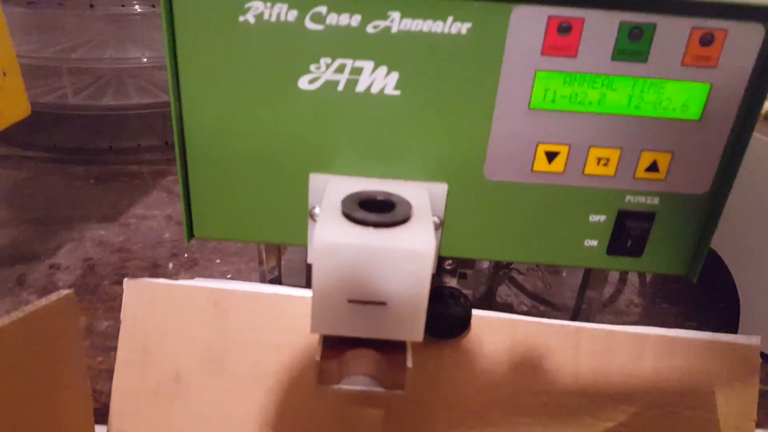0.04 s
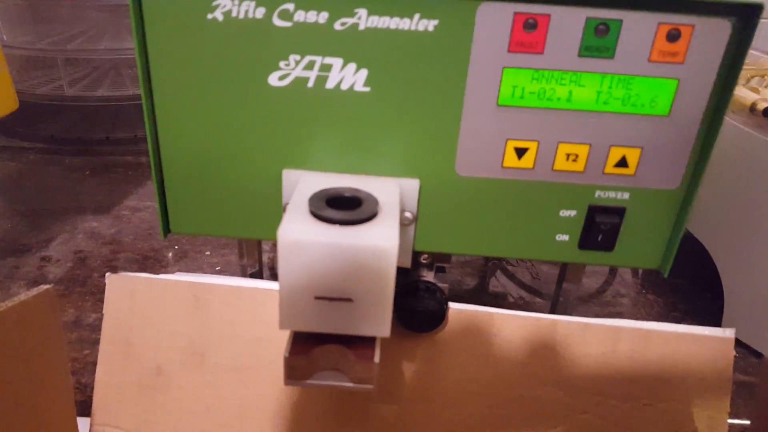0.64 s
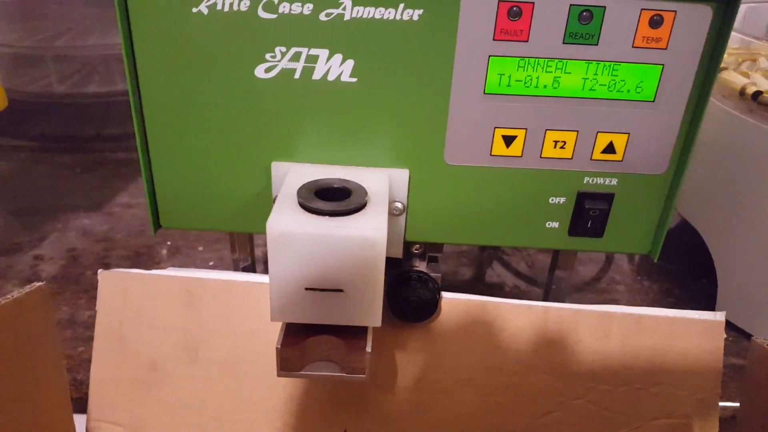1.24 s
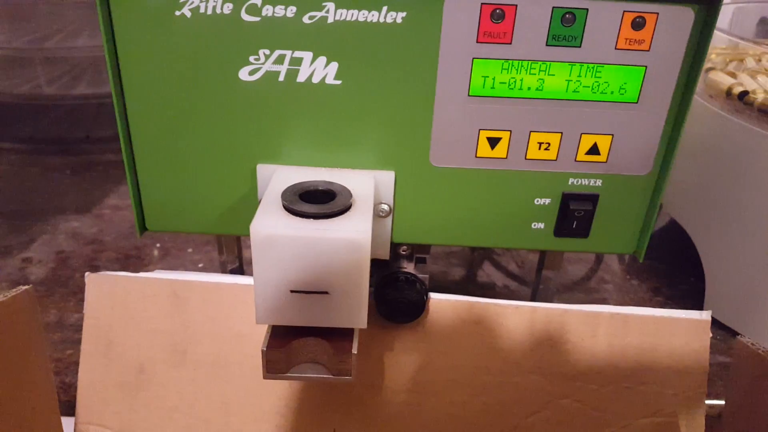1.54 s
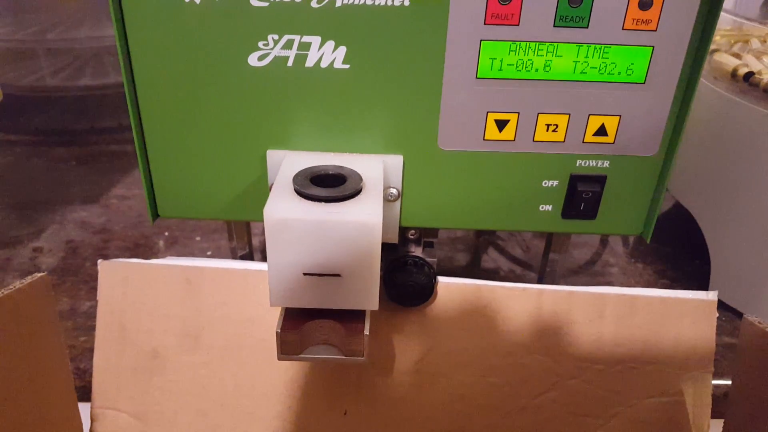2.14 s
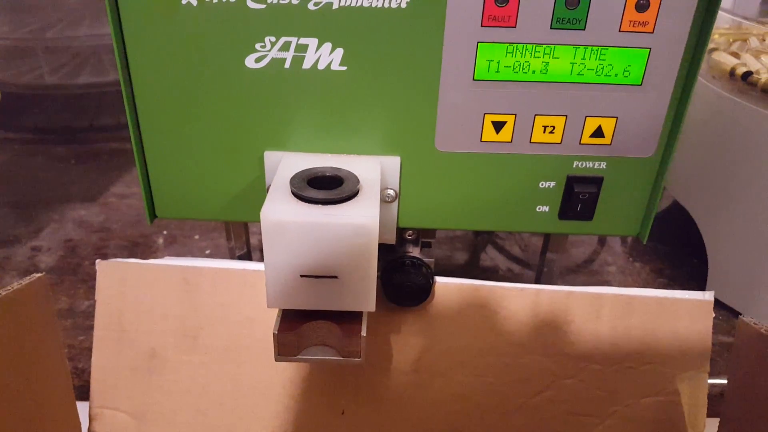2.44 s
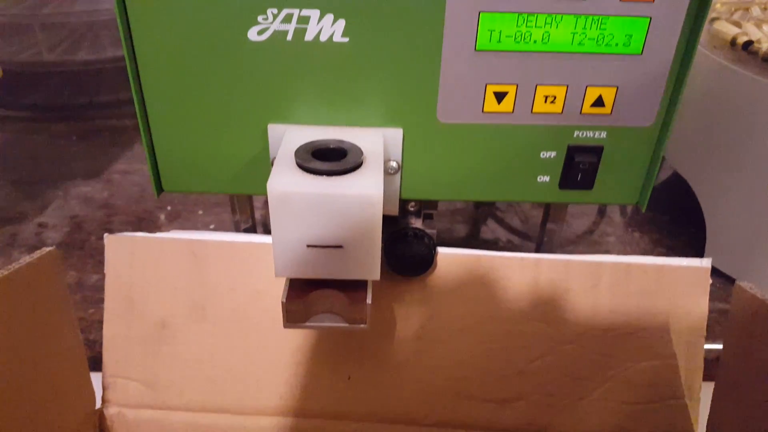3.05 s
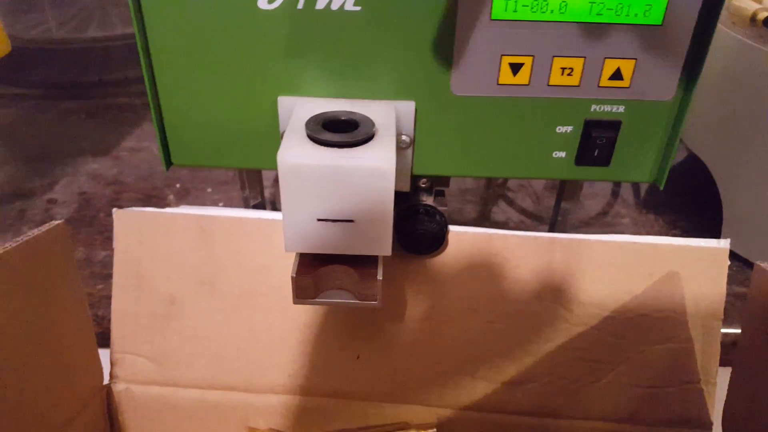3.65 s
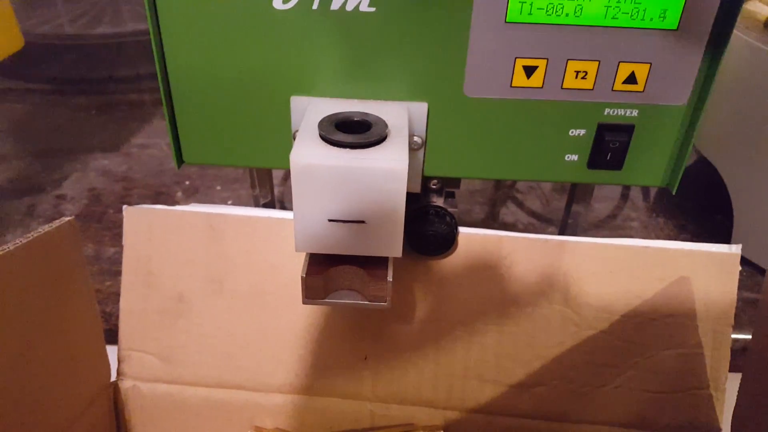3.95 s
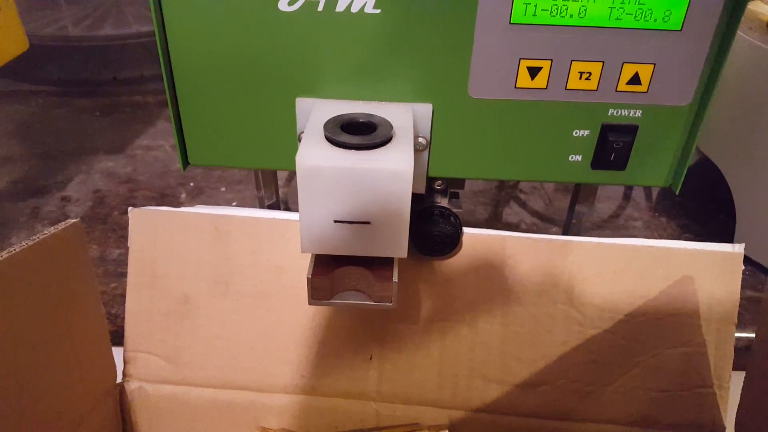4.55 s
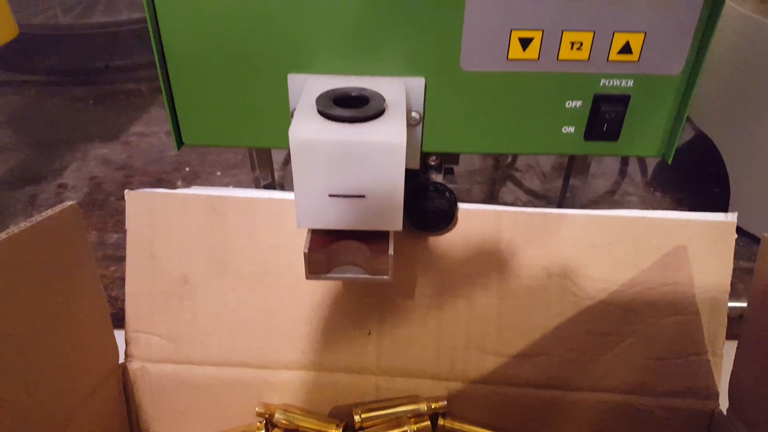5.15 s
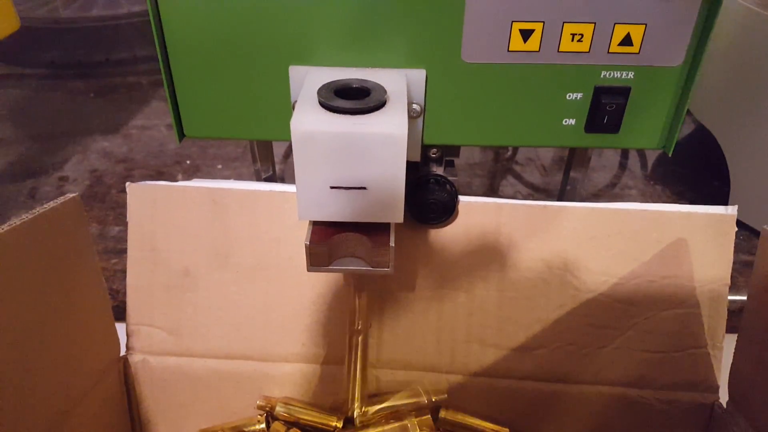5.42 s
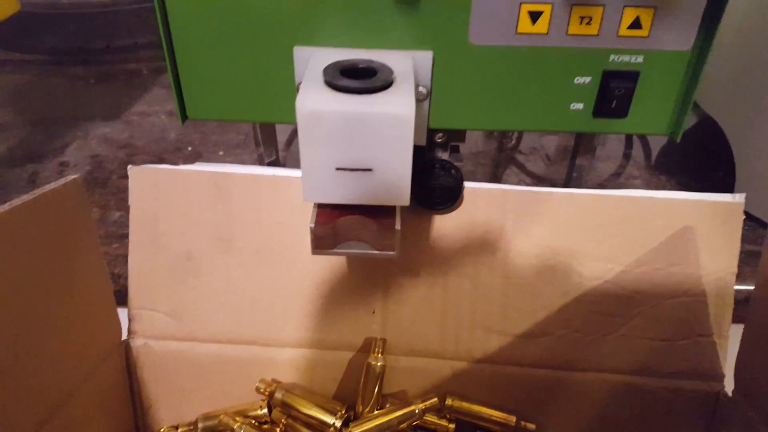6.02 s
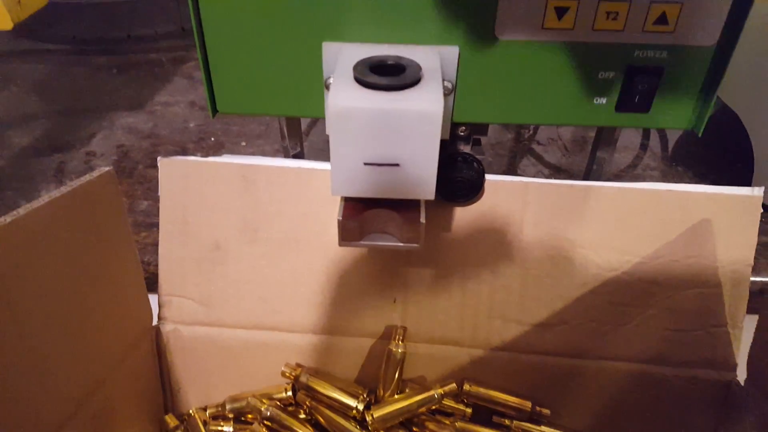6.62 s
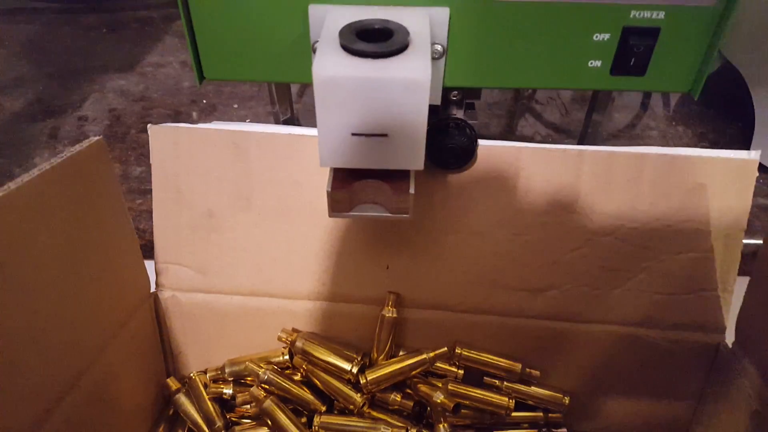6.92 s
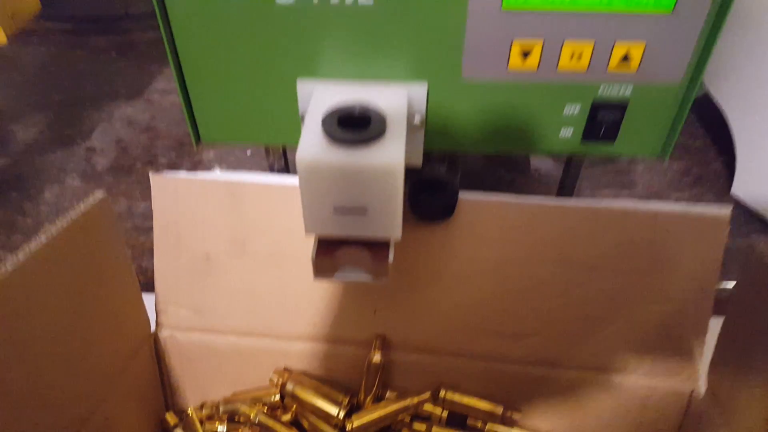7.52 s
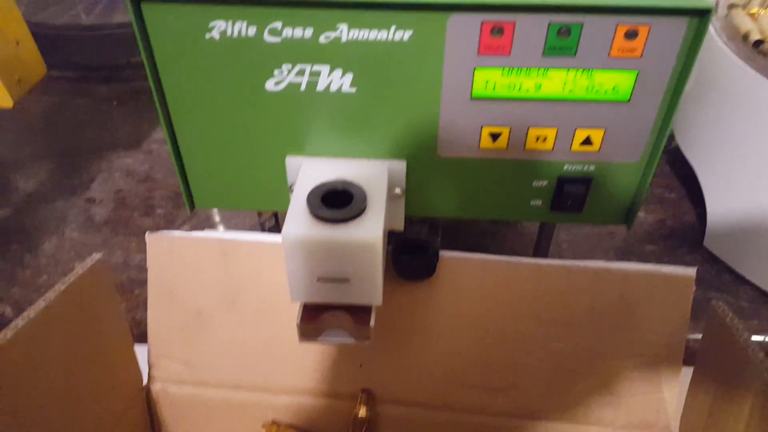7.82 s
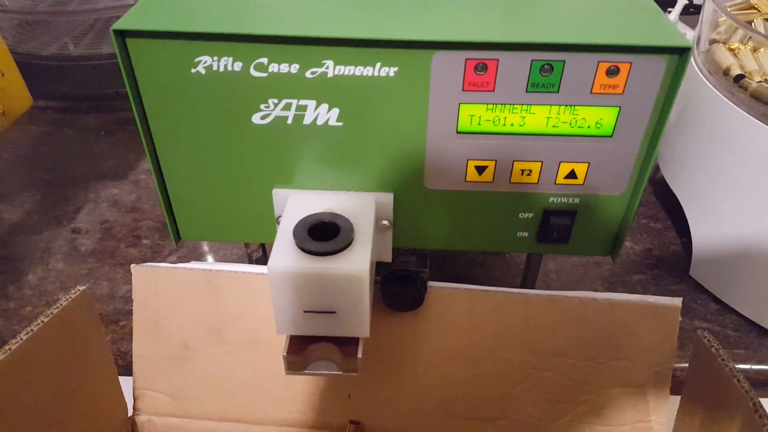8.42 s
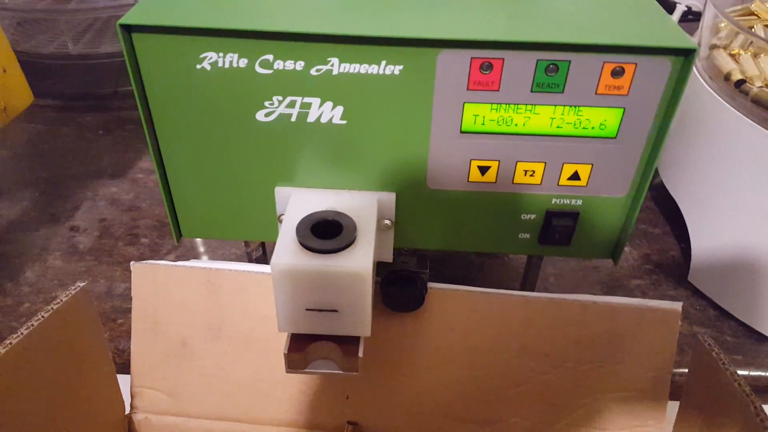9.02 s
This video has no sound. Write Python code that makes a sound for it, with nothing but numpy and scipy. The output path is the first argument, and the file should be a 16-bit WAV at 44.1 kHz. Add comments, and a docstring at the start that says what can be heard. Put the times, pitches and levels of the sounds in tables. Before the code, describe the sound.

Brass cases clink in a tub and one drops into a cardboard box, over a steady machine fan and snapping steel shutter.

```python
"""Case annealer on a workshop bench

The annealer's fan rushes and hums up close while a hand picks through a tub of brass cases that scrape,
clink and ring. A steel shutter snaps open; a case drops onto the heap in a booming cardboard box and
bounces to rest. The next case taps into the plastic holder, the shutter snaps back, the hand rummages."""
import sys
import numpy as np
from scipy import signal
from scipy.fft import rfft, irfft, next_fast_len
from scipy.io import wavfile
from scipy.ndimage import uniform_filter1d

SR = 44100
rng = np.random.default_rng(int(sys.argv[2]) if len(sys.argv) > 2 else 0)


def unload_wav(signal):
    """Save mono or channel-first audio to the path in sys.argv[1] as 16-bit WAV at rate SR, clipped to [-1, 1]."""
    wavfile.write(
        sys.argv[1],
        SR,
        np.round(np.clip(np.atleast_2d(signal).T, -1, 1) * 32767).astype(np.int16),
    )


N = 408807
T = np.arange(N) / SR
AGE = np.arange(SR // 4) / SR  # time since a blow

# the dropped case lands on the heap and bounces to rest: t/s, boom/dB, crunch/dB, tick/dB
BOUNCES = [(5.449, -4.5, -21, -43.5), (5.4534, -11.5, -2, -39), (5.4592, -6.5, -24, -19.5),
           (5.49, -15.5, -5.5, -4), (5.508, -14, -20, -9), (5.526, -35, -12, -7), (5.536, -32.5, -9, -20),
           (5.547, -16, -12.5, -15), (5.558, -23, -16, -28), (5.577, -15, -38.5, -40),
           (5.607, -39, -23, -23.5), (5.662, -37, -18, -9.5), (5.712, -30.5, -22.5, -13),
           (5.754, -37.5, -36.5, -28.5), (5.837, -43, -31, -30.5), (5.861, -36, -25.5, -23),
           (5.883, -44.5, -42, -50), (5.923, -51.5, -43, -40)]


def tub_clinks():
    """Cases knock together in the tub, their attacks blurred by its walls."""
    # the clearest knocks: t/s, tick/dB, ring/dB, left minus right/dB
    hits = [(0.172, -36, -50, -7), (0.2003, -18, -37, -11), (0.273, -28, -44, -2), (0.2864, -18.5, -22, -5),
            (0.3456, -30, -27, -2), (0.4299, -33, -31, -9), (0.4554, -35, -50, -2), (0.5425, -28, -38, -7),
            (0.595, -39, -35, 0), (0.7007, -17.5, -48, -3), (0.8618, -30.5, -26.5, -4),
            (7.36, -11, -18, -2), (7.4694, -33, -24.5, -2), (7.5497, -26.5, -34, 0), (7.63, -8, -26, 2),
            (7.6909, -4, -26, -3), (7.7567, -17, -26, -4), (8.012, -41, -39, -2), (8.0654, -18, -40, 3),
            (8.1105, -9.5, -21.5, -3.5), (8.1738, -14, -24, -3), (8.21, -6, -17, -2),
            (8.3307, -16.5, -26, 1), (8.504, -31, -64, -5), (8.5547, -25.5, -54, -4), (8.5767, -15, -40, 4),
            (8.6308, -13, -20.5, -2.5)]
    return contacts(hits, tick_db=-1, tick_t60=0.026, rise_s=0.0033, ring_db=-11,
                    hollow_db=-24.5, hollow_t60=0.064, chatter_db=-17)


def heap_clinks(settle_db_per_s=82):
    """Sharp, dry clinks on the open heap, ringing less as the dropped case settles."""
    landing_s = BOUNCES[0][0]
    hits = [(s, db, db - settle_db_per_s * (s - landing_s), 0) for s, _, _, db in BOUNCES]
    return contacts(hits, tick_db=-5.5, tick_t60=0.018, rise_s=0.0014, ring_db=-6.5,
                    hollow_db=-16.5, hollow_t60=0.02, chatter_db=-32)


def contacts(hits, tick_db, tick_t60, rise_s, ring_db, hollow_db, hollow_t60, chatter_db):
    """Each contact ticks, jostles its neighbours, sounds the air in a case and leaves its wall ringing."""
    # colour of a brass tick: f/Hz, level/dB
    tick_eq = [(200, -36), (700, 11.5), (1200, -13), (2100, 1.5), (3700, 4.5), (5000, 1.5), (7000, 8),
               (8300, 3), (10000, -8), (11500, 0.5), (13500, -0.5), (16000, -41)]
    ticks, rings = np.zeros((2, 2, N))
    for s, hit_db, case_db, pan_db in hits:
        tick = burst(hit_db, tick_t60, rise_s)
        chatter = burst(hit_db + chatter_db, t60=0.13)
        add(ticks, s, pan(pan_db) * (tick + chatter))
        # the pitch of the air in a case depends on how its neighbours cover the mouth
        air_hz = 2900 * 2 ** rng.uniform(-1.2, 0.7, size=2)
        air_modes = [(hz, hit_db + hollow_db, hollow_t60) for hz in air_hz]
        wall = undb(case_db + ring_db) * brass_case() * (1 - np.exp(-AGE / 0.0035))
        add(rings, s, pan(pan_db) * (wall + ring(air_modes, spread=0.58)))
    return undb(tick_db) * colour(ticks, tick_eq) + rings


def brass_case(detune=0.00923):
    """One case rings: its size sets the pitch, the point of contact the strength of each mode."""
    # wall modes of a brass case: f/Hz, level/dB, t60/s
    wall_modes = [(11440, 1.5, 0.091), (11520, -2, 0.15), (15480, 0.5, 0.12), (15680, -3.5, 0.16)]
    modes = [(hz, db + 3 * rng.uniform(-0.54, 1), t60) for hz, db, t60 in wall_modes]
    return ring(modes, stretch=1 + detune * rng.uniform(-1.6, 1), spread=1.82)


def rummage():
    """Sliding cases catch and slip: the slips scratch, ring several cases and drum on the tub."""
    # strokes of the hand: t/s, length/s, scrape/dB, ring/dB
    strokes = [(0.09, 0.11, -47, -55), (0.182, 0.11, -33.5, -38), (0.309, 0.28, -35.5, -48),
               (0.644, 0.15, -51, -66), (7.309, 0.099, -32, -48.5), (7.55, 0.05, -34, -30.5),
               (7.599, 0.05, -29.5, -19.5), (7.631, 0.036, -24, -18), (7.718, 0.034, -33.5, -26),
               (8.066, 0.16, -40, -37), (8.215, 0.077, -36.5, -42.5), (8.329, 0.11, -42.5, -46),
               (8.554, 0.078, -41, -47)]
    # colour of brass sliding on brass: f/Hz, level/dB
    scrape_eq = [(300, -10), (1200, 5), (2100, 7.5), (3500, 8), (5000, -0.5), (7000, 1), (8300, -0.5),
                 (10000, -16), (12000, 3.5), (14500, -15), (16000, -13)]
    # body of the tub: f/Hz, level/dB
    tub_eq = [(30, -20.5), (80, -3), (150, -12), (300, -10), (450, 1.5), (560, -1.5), (660, 11.5), (820, 4),
              (1000, 5.5), (1300, -3.5), (2000, -6), (4000, -71)]
    scrape_gain, ring_gain = np.zeros((2, N))
    for s, length_s, slide_db, case_db in strokes:
        push = gesture(s, length_s, attack_s=0.016, t60=0.19)
        scrape_gain = np.maximum(scrape_gain, undb(slide_db) * push)
        ring_gain = np.maximum(ring_gain, undb(case_db) * push)
    slips = [grains(per_s=110) * noise(N) for _ in range(3)]
    rings = unit(sum(convolve(slip, brass_case() * fade(0.1)) for slip in slips))
    force = scrape_gain * unit(sum(slips))
    bright = colour(force, scrape_eq) + ring_gain * rings
    return pan(-2) * undb(-4) * bright + undb(-5) * colour(force, tub_eq)


def hollow_knocks():
    """Some contacts wake a short, pitched, hollow resonance."""
    # cases against the tub and the heap: t/s, f/Hz, level/dB
    knocks = [(0.173, 2000, -32.5), (0.201, 640, -29), (0.275, 2800, -29), (0.283, 2000, -27.5),
              (0.347, 700, -25.5), (0.43, 520, -30.5), (0.509, 1840, -27.5), (0.564, 600, -27),
              (5.488, 1430, -18), (5.541, 800, -13), (5.662, 1500, -23), (7.652, 1300, -25.5),
              (7.676, 1000, -26.5), (8.064, 810, -22.5), (8.286, 810, -28.5)]
    out = np.zeros((2, N))
    for s, hz, db in knocks:
        add(out, s, resonance(burst(db + 2, t60=0.036), hz, width_hz=380))
    return out


def cardboard_box(flex_hz=45, flex_width_hz=60):
    """The cardboard floor booms under the falling case; the heap on it cracks and crunches."""
    # modes of the loaded box: f/Hz, level/dB, t60/s
    box_modes = [(108, -30, 0.12), (202, -15, 0.067), (236.6, -4.5, 0.07), (251.5, -13, 0.38),
                 (353, -7.5, 0.04), (493, -10.5, 0.051), (537, -11, 0.12)]
    # colour of the crunching heap: f/Hz, level/dB
    crunch_eq = [(30, -23), (130, -21.5), (300, 2), (500, 6.5), (660, -15), (850, 7), (1200, 2.5),
                 (1550, 2), (1750, -9), (2450, -4.5), (3500, -24.5), (8000, -21.5), (16000, -41.5)]
    booms, crunches, flex = np.zeros((3, 2, N))
    for s, boom_db, crunch_db, _ in BOUNCES:
        add(booms, s, undb(boom_db - 1) * ring(box_modes, spread=0.14))
        crack = burst(crunch_db + 2, t60=0.0082)
        add(crunches, s, crack + burst(crunch_db - 3, t60=0.039))
    # a small box radiates little deep bass, except as its whole floor gives under the landing
    thud = burst(-31, t60=0.12)
    for _ in range(2):
        thud = resonance(thud, flex_hz, flex_width_hz)
    add(flex, BOUNCES[0][0], thud / np.sqrt(SR / (np.pi * flex_width_hz)))
    return pan(2) * highpass(booms + colour(crunches, crunch_eq), 110, order=3) + flex


def shutter(detune=0.024):
    """The steel shutter snaps, rings and chatters; the cabinet hums after each blow."""
    # blows against the stop: t/s, snap/dB, cabinet/dB, snap t60/s
    blows = [(5.314, -29.5, -43.5, 0.14), (5.335, -29, -53, 0.074), (5.345, -6.5, -27, 0.014),
             (5.353, -18, -28.5, 0.069), (5.366, -26, -23, 0.21), (6.5442, -9, -50.5, 0.022),
             (6.559, -19.5, -20.5, 0.11), (6.575, -17.5, -20.5, 0.03)]
    # modes of the steel shutter: f/Hz, level/dB, t60/s
    steel_modes = [(1980, -16.5, 0.29), (5710, -3, 0.086), (6900, 1.5, 0.08), (7260, -9.5, .11),
                   (14000, 0.5, 0.078)]
    # modes of the sheet-metal cabinet: f/Hz, level/dB, t60/s
    cabinet_modes = [(104, -11, 0.22), (182, -2, 0.1), (319, -4, 0.15), (553, -4.5, 0.2), (855, -11, .1)]
    # colour of the snap: f/Hz, level/dB
    snap_eq = [(40, -21), (150, 2.5), (700, -3), (1600, -1.5), (2400, -1), (3300, -5.5), (4500, -3),
               (6200, 2.5), (7500, 0.5), (10000, -5), (13300, 0), (15000, -5), (16500, -15.5)]
    snaps, steel, panels = np.zeros((3, 2, N))
    for s, snap_db, cabinet_db, t60 in blows:
        add(snaps, s, burst(snap_db, t60))
        # the loose parts sit a little differently at every blow
        stretch = 1 + detune * rng.uniform(-1, 1)
        add(steel, s, undb(snap_db - 16) * ring(steel_modes, stretch, spread=1.5))
        add(panels, s, undb(cabinet_db - 2) * ring(cabinet_modes, stretch, spread=1.0))
    return colour(snaps, snap_eq) + steel + highpass(panels, 90, order=3)


def holder():
    """Short hollow taps of brass on the plastic block."""
    # the case touches the holder: t/s, level/dB
    touches = [(6.296, -29), (6.32, -36), (6.361, -48.5), (6.398, -49.5), (6.49, -22), (6.497, -20.5),
               (6.508, -35), (6.523, -42), (6.546, -16)]
    # modes of the hollow holder: f/Hz, level/dB, t60/s
    cavity_modes = [(359, -10.5, 0.16), (845, 2.5, 0.017), (1504, 0.5, 0.021), (1945, -9.5, 0.027)]
    # colour of a tap on plastic: f/Hz, level/dB
    plastic_eq = [(100, -13), (350, -6), (600, 3), (900, 5), (1200, 2.5), (1700, 2.5), (2300, -1),
                  (3200, -10), (5000, -31), (7500, -20.5), (10000, -51), (16000, -24)]
    taps, hollow = np.zeros((2, 2, N))
    for s, db in touches:
        add(taps, s, burst(db, t60=0.03))
        add(hollow, s, undb(db) * ring(cavity_modes, spread=0.88))
    return pan(2) * undb(-4) * highpass(colour(taps, plastic_eq) + hollow, 140)


def tub_rumble(hz=78, width_hz=95):
    """Soft low bumping each time the tub shifts."""
    # the hand shifts the tub: t/s, length/s, level/dB
    shifts = [(7.308, 0.058, -47.5), (7.55, 0.25, -56.5), (8.062, 0.69, -60), (8.2, 0.04, -51),
              (8.34, 0.035, -53)]
    low = resonance(noise(N, shared_hz=61), hz, width_hz)
    low = unit(resonance(low, hz, width_hz))
    return low * sum(undb(db) * gesture(s, length_s, attack_s=0.022, t60=0.45)
                     for s, length_s, db in shifts)


def fan(wobble=0.00299, flutter_db=1.0, lag_s=0.00016):
    """Rushing air, and blade tones that waver with the speed of the rotor."""
    # colour of the rushing air: f/Hz, level/dB
    air_eq = [(30, -36), (70, -11), (115, -0.5), (200, 2), (420, -5.5), (620, 3.5), (720, 2.5), (1320, 0),
              (1450, -6), (1750, -0.5), (1970, -0.5), (2100, -10.5), (2700, -12), (3700, -21.5),
              (7200, -25), (10200, -41), (13100, -26.5), (16000, -37.5)]
    # blade tones: f/Hz, level/dB
    blades = [(335.5, -54), (671, -79), (1006.5, -72), (1534, -64.5), (1725, -62.5)]
    air = colour(noise(N, shared_hz=904), air_eq)
    # echoes inside the housing comb the rush into many narrow resonances
    echoes = noise(len(AGE)) * fade(0.097)
    air = unit(air + undb(-10) * convolve(air, echoes / np.linalg.norm(echoes[0])))
    air *= undb(-46 + 0.03 * wander(5))
    rotor_s = np.cumsum(1 + wobble * wander(12)) / SR
    rotor_s = np.array([rotor_s, rotor_s - 0.0007])  # the tones differ in phase, left to right
    tones = np.zeros((2, N))
    for hz, db in blades:
        rms = undb(db - 2.5 + flutter_db * wander(12))
        tones += rms * np.sqrt(2) * np.sin(2 * np.pi * hz * rotor_s)
    draught = undb(-78) * resonance(rng.standard_normal((2, N)), hz=36.2, width_hz=52)
    left, right = air + tones + draught
    left = np.interp(T - lag_s, T, left)  # the sound reaches the right microphone first
    return pan(0.14) * np.array([left, right])


def recorder_ducking(fall_s=0.2, hold_s=0.32, return_s=0.47, fade_in_db=8, fade_in_s=0.36):
    """The recorded background level fades in, then ducks briefly around the two loudest knocks."""
    dips = [(5.52, 9.5), (6.47, 5.5)]
    corners = np.cumsum([0, fall_s, hold_s, return_s])
    dip_db = sum(depth_db * np.interp(T - s, corners, [0, 1, 1, 0]) for s, depth_db in dips)
    return undb(-dip_db - fade_in_db * np.clip(1 - T / fade_in_s, 0, 1))


def room(x, t60=0.2, wet_db=-8, gap_s=0.0018):
    """Bench and walls send back a short dense echo, weak in the bass."""
    tail = noise(len(AGE)) * fade(t60) * np.clip(AGE / gap_s - 1, 0, 1)
    tail /= np.sqrt(np.sum(tail ** 2) / 2)
    return x + undb(wet_db) * convolve(x, highpass(tail, 350, order=1))


def microphones(x):
    """Each of the two microphones favours its own bands."""
    # stereo balance: f/Hz, left minus right/dB
    balance = [(100, 1), (200, -1), (370, -7.5), (700, 0.5), (1500, 4.5), (2400, 3), (3800, -2), (7500, 8),
               (11500, -2), (13500, 5), (15500, -2)]
    size = next_fast_len(N + len(AGE))
    balance_db = eq_curve(balance, size)
    gains = undb(np.array([balance_db, -balance_db]) / 2)
    return irfft(rfft(x, size) * gains, size)[:, :N]


def burst(db, t60, rise_s=0.0005):
    """The brief rough push of one contact."""
    return undb(db) * fade(t60) * (1 - np.exp(-AGE / rise_s)) * noise(len(AGE))


def ring(modes, stretch=1, spread=0):
    """Decaying modes; stretch scales their pitch, spread (radians) scatters their phase per channel."""
    phases = spread * rng.standard_normal((len(modes), 2, 1))
    return sum(undb(db) * fade(t60) * np.sin(2 * np.pi * hz * stretch * AGE + phase)
               for (hz, db, t60), phase in zip(modes, phases))


def grains(per_s, scatter_db=3.0, t60=0.041):
    """Random small contacts of uneven strength, as a force envelope."""
    onsets = rng.random(N) < per_s / SR
    strength = undb(scatter_db * np.minimum(rng.exponential(size=N), 3))
    power = signal.fftconvolve(onsets * strength ** 2, fade(t60) ** 2)[:N]
    return unit(np.sqrt(np.abs(power)))


def gesture(start_s, length_s, attack_s, t60):
    """Envelope of one movement: it builds up, holds and dies away."""
    age = T - start_s
    return np.clip(age / attack_s, 0, 1) * np.exp(-np.log(1000) * np.clip(age - length_s, 0, 2) / t60)


def fade(t60):
    """Exponential decay after a blow."""
    return np.exp(-np.log(1000) * AGE / t60)


def wander(rate_hz):
    """Slow random drift of rms 1."""
    step = int(SR / rate_hz)
    held = np.repeat(rng.standard_normal(N // step + 1), step)
    return unit(uniform_filter1d(uniform_filter1d(held, step), step)[:N])


def noise(size, shared_hz=900):
    """Noise at two microphones: long waves reach both alike, short ones do not."""
    mid, side = rng.standard_normal((2, size))
    side = highpass(side, shared_hz, order=1)
    return unit(np.array([mid + side, mid - side]))


def eq_curve(points, size):
    """Level in dB at each FFT bin, through (Hz, dB) points."""
    hz, db = np.transpose(points)
    return np.interp(np.log(np.fft.rfftfreq(size, 1 / SR) + 1), np.log(hz), db)


def colour(x, points, size=4096):
    """Minimum-phase EQ of unit power gain: nothing sounds ahead of an attack."""
    gain = unit(undb(eq_curve(points, size)))
    cepstrum = irfft(np.log(gain))
    cepstrum[1:size // 2] *= 2
    cepstrum[size // 2 + 1:] = 0
    return convolve(x, irfft(np.exp(rfft(cepstrum)))[None])


def resonance(x, hz, width_hz):
    """One broad resonance; white noise keeps its level."""
    return signal.lfilter(*signal.iirpeak(hz, hz / width_hz, fs=SR), x) * np.sqrt(SR / (np.pi * width_hz))


def highpass(x, hz, order=2):
    """Take away the bass."""
    return signal.sosfilt(signal.butter(order, hz, "high", fs=SR, output="sos"), x)


def convolve(x, response):
    """Play a stereo track through an impulse response."""
    return signal.oaconvolve(x, response, axes=1)[:, :N]


def add(out, s, sound):
    """Mix a sound in at time s."""
    i = int(s * SR)
    out[:, i:i + sound.shape[1]] += sound[:, :N - i]


def pan(db):
    """Channel gains for a left-minus-right level."""
    return undb(np.array([[db], [-db]]) / 2)


def undb(db):
    """Decibels to gain."""
    return 10 ** (np.asarray(db) / 20)


def unit(x):
    """Scale to rms 1."""
    return x / np.sqrt(np.mean(x ** 2))


def scene():
    """All the handling sounds in the workshop, over the fan."""
    brass = tub_clinks() + heap_clinks() + rummage() + hollow_knocks()
    handling = room(brass + cardboard_box() + shutter() + holder()) + tub_rumble()
    return handling + fan() * recorder_ducking()


def record(dry, top_hz=16000):
    """The microphones colour the sound; the recorder clips at full scale and cuts the top."""
    clipped = np.clip(microphones(dry), -1, 1)
    return signal.sosfilt(signal.ellip(10, 0.2, 70, top_hz, fs=SR, output="sos"), clipped)


dry = scene()
out = record(dry)
unload_wav(out)
```